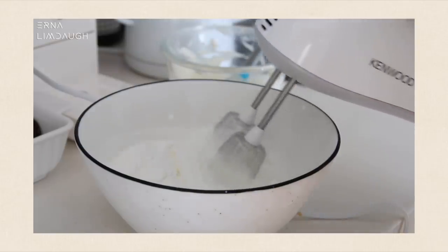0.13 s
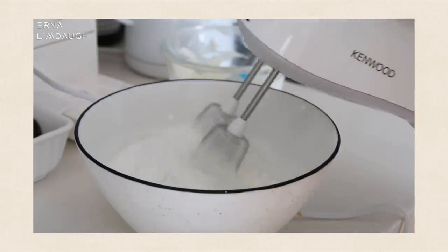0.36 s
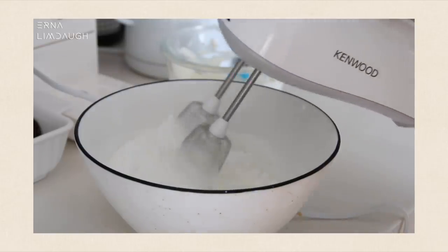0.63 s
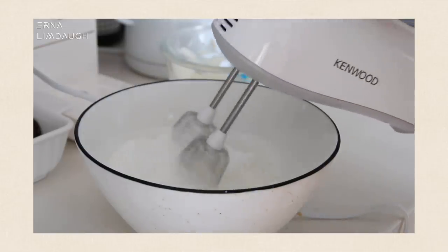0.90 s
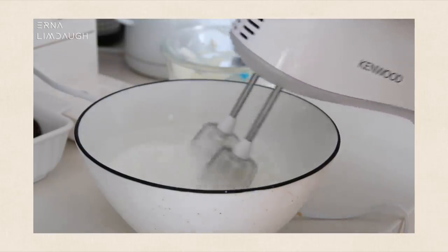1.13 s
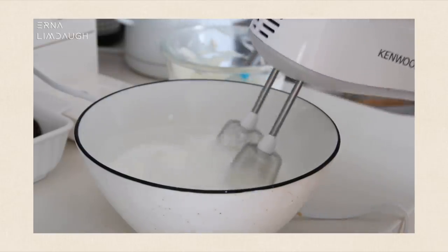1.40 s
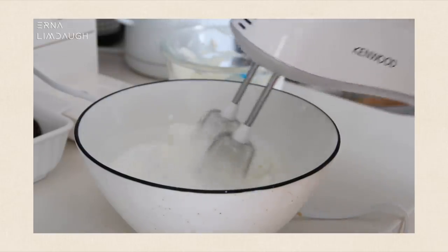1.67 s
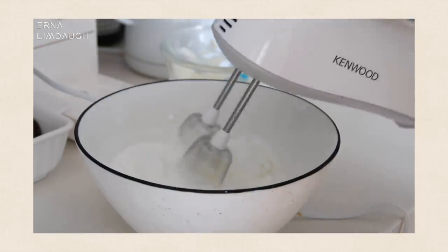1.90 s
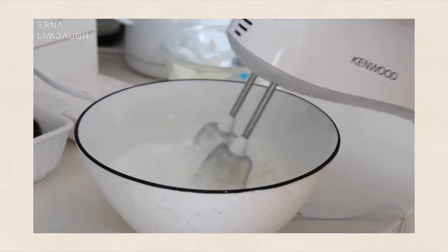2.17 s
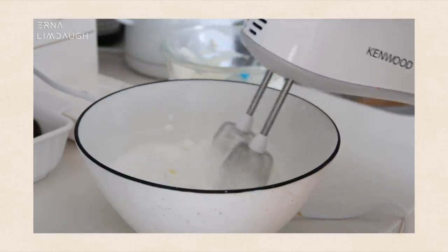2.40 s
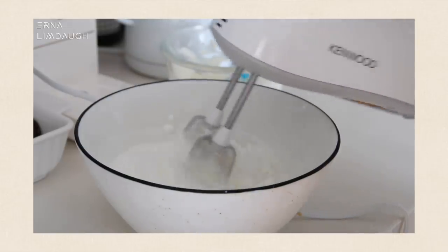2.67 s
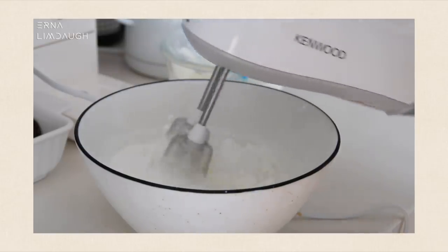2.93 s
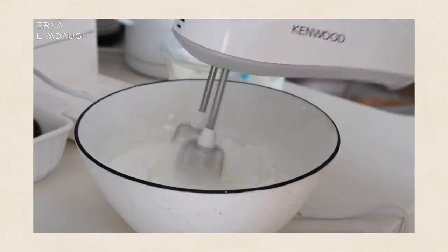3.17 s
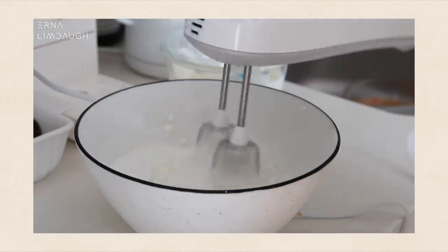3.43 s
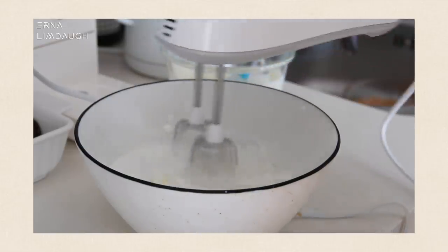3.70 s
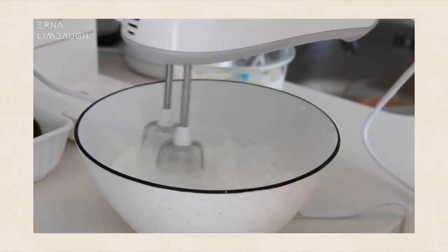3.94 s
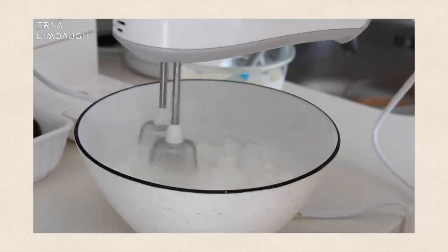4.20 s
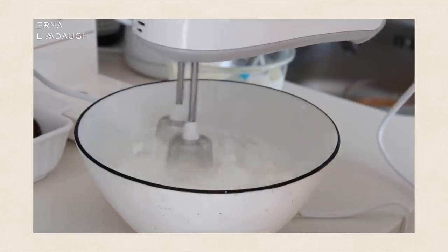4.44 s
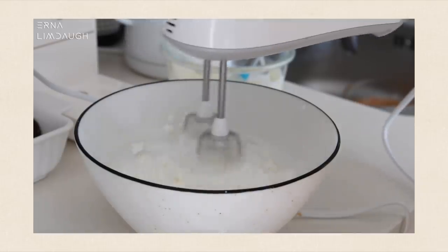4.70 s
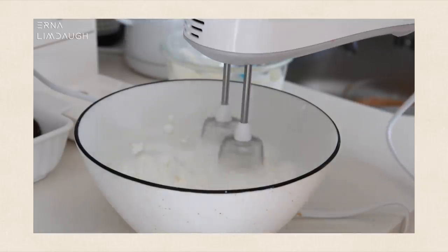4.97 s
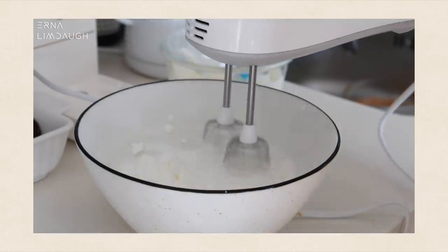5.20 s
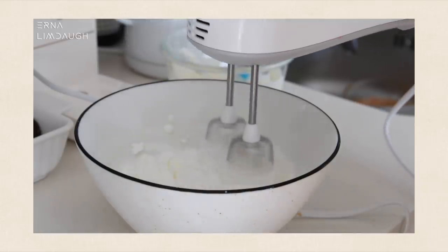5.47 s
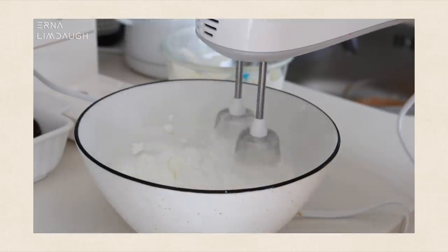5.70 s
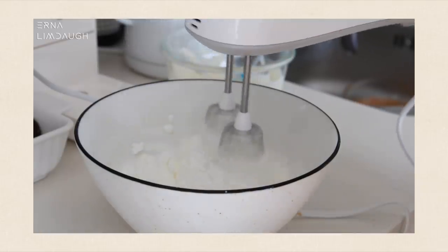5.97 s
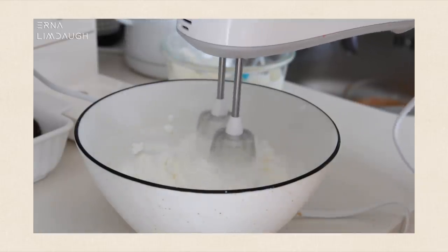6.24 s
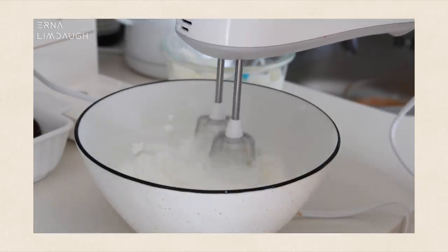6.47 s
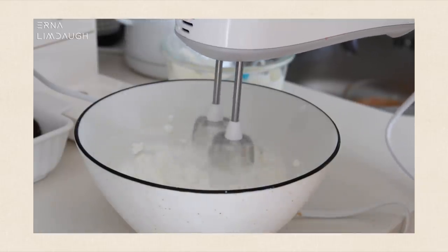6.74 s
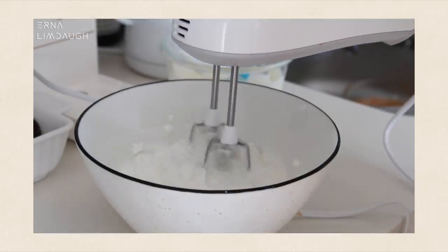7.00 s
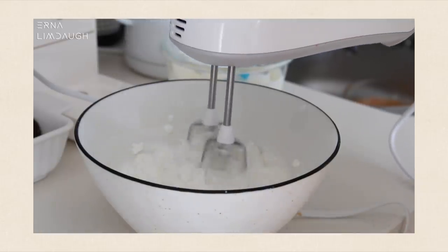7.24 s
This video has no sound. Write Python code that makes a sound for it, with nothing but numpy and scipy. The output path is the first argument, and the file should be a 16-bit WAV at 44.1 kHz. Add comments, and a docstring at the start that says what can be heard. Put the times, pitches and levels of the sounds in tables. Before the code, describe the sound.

An electric hand mixer is already running at full speed, close by and slightly left, in a small kitchen with a short dull echo. Its high, buzzing whine throbs rapidly, swelling and fading as the hand moves, over a low drone, fan air and gear rush. Soft, dull cream slaps flutter underneath. From 0 to 0.6 s the beaters strike the enamel bowl in bright, ticking clinks, the last ones weaker. Two duller, boomy knocks come around 2.9 s. From 4.1 to 4.9 s an irregular rattle of clacks and clinks breaks out. The pitch sags very slightly under load, lifting briefly near 5.8 s. Faint taps come at 6.2 and 6.4 s. At about 6.45 s power cuts: the whine vanishes and the motor coasts downward, quieter and rougher. At 7.06 s it kicks in again with a coarse, sparking growl, climbing in pitch until the end at about 7.4 s, still below full speed.

```python
"""In a kitchen, a hand mixer whips cream in an enamel bowl. The brushed motor whines at twelve slots a turn,
amplitude-modulated at twice the mains rate; filtered noise gives fan air and gear rush, and short dull
resonances give the slapping cream. The beaters now and then knock the bowl, whose modes ring and echo.
Near the end the power is cut, the motor coasts down, and it is switched on again and growls up to speed."""
import sys
import numpy as np
from scipy import signal
from scipy.fft import irfft
from scipy.io import wavfile

SR = 44100
rng = np.random.default_rng(int(sys.argv[2]) if len(sys.argv) > 2 else 0)


def dump_mix(stems):
    """Bounce the given channels to the path in sys.argv[1] as a 16-bit WAV at rate SR."""
    frames = np.atleast_2d(stems).T  # one column per channel
    limited = np.clip(frames, -1, 1)  # hard clip at full scale
    pcm = np.round(limited * 32767).astype(np.int16)
    wavfile.write(sys.argv[1], SR, pcm)


def convert_level_to_amplitude(level_db):
    """Map a level in decibels to its linear amplitude factor."""
    exponent = np.asarray(level_db, float) / 20
    return 10 ** exponent


N = 325017

# Stereo: left-right likeness against pitch (f/Hz, likeness); the lean of most sources to the left
LIKENESS = [(60, 0.97), (180, 1), (550, 0.96), (1650, 0.85), (4970, 0.053), (15000, 0.072)]
LEFT_DB, GROWL_LEFT_DB = 5.5, 4.5

# Noise spectra: mixer rush, relative (f/Hz, level/dB), and room floor, relative (f/Hz, level/dB)
RUSH_COLOUR = [(20, -58), (40, -15), (100, -37), (174, -15), (250, -29), (330, -6.5), (486, -8),
               (801, -8.5), (1040, -11), (1960, -16), (2540, -2.5), (2900, -15.5), (3400, -12),
               (6000, -24.5), (8740, -21), (12000, -33.5), (16000, -33)]
ROOM_COLOUR = [(24, -58), (40, -24), (101, 3.5), (130, -2.5), (1680, -5.5), (2050, -62), (3380, -27),
               (16000, -13)]
# Resonances of the plastic housing (f/Hz, width/Hz, gain/dB)
HOUSING = [(565, 22, 8.5), (1239, 59, 8.5), (1856, 234, 3.5), (2840, 120, 4.5)]
# Densities in dB per Hz, to which the colours are added; the laws are in dB per decade of speed
ROOM_DB, BODY_DB, HISS_DB = -94.5, -75.5, -74.5
BODY_LAW_DB, HISS_LAW_DB = 38.5, 19

KITCHEN_T60_S, WALL_CUT_HZ, ECHO_DB = 0.3, 7000, -11

# Dull notes of beaters and bowl wall under the cream (f/Hz, level/dB, t60/s)
BURBLE = [(425, -52.5, 0.044), (546.8, -54, 0.14), (597, -57.5, 0.067), (1236, -52.5, 0.039),
          (1952, -53.5, 0.046)]
SLAPS_PER_S, SLAP_SPREAD_DB = 30, 4   # for each note, at full speed

# Beater on bowl (t/s, clink level/dB, boom level/dB, thud level/dB, ring level/dB, tick over clack/dB)
KNOCKS = [(.0407, -35, -28, -37, -44.5, 6), (.0602, -34.5, -44, -38.5, -49, 4),
          (.1245, -31.5, -37, -37.5, -49, 10), (.2108, -31.5, -32, -39, -47.5, 8),
          (.2966, -29, -42, -37.5, -40, 1), (.3839, -32.5, -38, -40, -38, 2.5),
          (.4942, -42, -57, -64, -60, -6), (.5844, -42, -53, -51, -49, -14),
          (2.877, -45, -31, -39, -58.5, -28), (2.9606, -42, -31.5, -40.5, -53, -22),
          (4.0715, -35, -34, -50, -46, -12), (4.0925, -32, -44, -39, -38.5, 4),
          (4.1134, -30.5, -56, -39, -43, -4), (4.1863, -37, -44, -42, -59, -5),
          (4.2047, -30.5, -36, -36.5, -49.5, 2), (4.3, -36, -37, -44, -58, -17),
          (4.3898, -32.5, -36.5, -37.5, -54, -4), (4.4871, -40, -40, -49, -55, -15),
          (4.6517, -34.5, -47, -45, -46, -14), (4.6712, -31.5, -34, -38, -53, -19),
          (4.7211, -31.5, -58, -42, -69, -15), (4.7425, -32.5, -39, -47, -44.5, -14),
          (4.7665, -38, -44, -44, -59, -18), (4.8398, -43, -51, -59, -66, -12),
          (4.8603, -35, -43, -49, -62, -15), (6.1994, -42.5, -55, -48, -62, 0),
          (6.4062, -42, -52, -42, -62, 1), (7.08, -48.5, -60, -48.5, -51.5, -1)]
# Bands of contact noise (low f/Hz, high f/Hz, level/dB)
CRACK = [(90, 580, 8.5), (315, 1400, 11), (1780, 2670, 8), (3800, 6330, -2.5), (6600, 9000, -1),
         (10000, 21000, -4)]
# Modes of the bowl (f/Hz, level/dB, t60/s); each takes the strength of its band
BOWL = [(139, -24.5, 0.37), (283, -12.5, 0.089), (580.3, -5.5, 0.14), (777, -0.5, 0.32),
        (1115, -4.5, 0.033), (1483, -29, 0.18), (1845, -8.5, 0.047), (1960, -15, 0.25), (2450, -11, 0.015),
        (2660, -20, 0.05), (3590, -20, 0.124), (4635, -17.5, 0.039), (4750, -14, 0.0089), (5510, -25, 0.17),
        (5600, -37, 0.018), (6870, -12, 0.038), (7820, -13, 0.097), (9320, -10.5, 0.095), (9810, -4, 0.024),
        (10520, -25, 0.15)]
# Limits between boom, thud, ring, clack, clink and tick (f/Hz)
BAND_EDGES_HZ = [220, 680, 1300, 3000, 6500]
CRACK_T60_S = 0.02
EDGE_DB = -7.5          # clack and tick lie around this, relative to the clink
SWELL_CYCLES = 2        # time constant with which the bowl wall takes up a blow
SINGS_S, SING_DB = 0.13, 3   # treble modes lasting longer also follow the ring level, with this gain

# Motor speed: sags under the cream, coasts and picks up again (t/s, turns per s)
SPEED = [(0, 246), (.36, 245), (.68, 245.2), (1.3, 242), (1.65, 242.5), (2.05, 243.6), (2.44, 242.8),
         (2.76, 241), (3.3, 240.6), (3.65, 241.2), (4.04, 239.4), (4.45, 238.7), (4.84, 237.1),
         (5.4, 236.7), (5.55, 238), (5.8, 243.4), (5.98, 243.6), (6.12, 241.6), (6.2, 239.5), (6.44, 229.2),
         (6.53, 204), (6.6, 187), (6.7, 155), (6.9, 103), (7.0, 81.5), (7.05, 74), (7.065, 74.5),
         (7.09, 78), (7.13, 84.5), (7.18, 96.5), (7.22, 105), (7.26, 111.5), (7.31, 117.5), (7.37, 122.5)]
# Whine lines, swelling and fading as the hand turns the vents (t/s, slot level/dB, mains line below level/dB,
# mains line above level/dB, commutator level/dB, second mains line below level/dB, left-right/dB)
WHINE = [(0.0, -53, -59, -52, -74, -62, 21), (0.14, -57.5, -63, -63, -62, -68, 5),
         (0.28, -58, -59, -65, -62, -63, 6), (0.42, -57, -66, -65, -83, -61, 1),
         (0.56, -64, -57.5, -58.5, -65, -60, 11), (0.7, -69, -52, -52.5, -71, -59, 12),
         (0.84, -54, -57, -57, -68, -55, 2.0), (0.98, -61, -56, -56, -66.5, -64.0, 6),
         (1.12, -57, -51.5, -58, -66, -63, 2), (1.26, -56, -51, -72, -67, -59, 1.0),
         (1.4, -52.5, -50, -71.0, -80, -68, 2), (1.54, -48.5, -51, -73, -81, -73, 0),
         (1.68, -52.5, -50, -68, -70, -62, 0), (1.82, -59, -52, -60, -69, -62, 11),
         (1.96, -67, -51.5, -55, -67, -57.5, 12), (2.1, -62, -52, -56, -69, -67, 8),
         (2.24, -57, -55, -56, -73, -59, 10), (2.38, -53, -59, -62, -70, -70, 14),
         (2.52, -53, -53, -78, -77, -62, -4), (2.66, -56, -51, -57, -68, -58, 7),
         (2.8, -63, -47.5, -62, -67, -66, 7), (2.94, -58, -47.5, -59, -73, -68, 7),
         (3.08, -54, -49.5, -58, -69, -65, 4), (3.22, -52, -47.5, -56, -66.5, -68, 1),
         (3.36, -49.5, -59, -56, -69, -60, 7), (3.5, -46, -55, -56, -65, -56, 9),
         (3.64, -46.5, -66, -61, -76.0, -57, 5), (3.78, -44, -56.5, -58, -70, -58, 3),
         (3.92, -50, -57, -62, -69, -65, 0.0), (4.06, -49.0, -58.5, -58, -62, -59, 6),
         (4.2, -60, -65, -60, -81, -56.0, -5), (4.34, -51.5, -74, -60, -69.0, -52, 3),
         (4.48, -56, -55, -61.0, -80, -53.5, 7), (4.62, -55, -56, -62, -71, -60.5, 4.0),
         (4.76, -59, -79, -61, -64, -64, 5.0), (4.9, -47.5, -71, -56, -68, -67.5, 10),
         (5.04, -44.5, -54, -62, -66, -64, 8.0), (5.18, -44, -58, -58, -67, -60, 9),
         (5.32, -43, -55, -63, -63, -67, 9.0), (5.46, -47, -55, -54, -65, -66, 8),
         (5.6, -49, -57, -61, -72, -69, 11), (5.74, -52.5, -58.5, -58, -66, -67, 13),
         (5.88, -50.0, -55, -54, -78, -65.5, 15), (6.02, -51, -62, -56.0, -69.0, -73, 23),
         (6.16, -52.5, -70, -57, -64, -55, 12), (6.26, -48.5, -53, -62, -74, -66, 6.0),
         (6.34, -55.5, -59, -60, -65, -65, 6.0), (6.4, -51, -53, -59, -72, -63, 9),
         (6.45, -54, -71.5, -52, -68, -65, 4.0)]
# Part reaching the two sides out of step, by paths round the housing
# (t/s, slot level/dB, mains line below level/dB, mains line above level/dB)
OUT_OF_STEP = [(0.0, -60.0, -62.0, -65.0), (0.28, -67.0, -54, -64), (0.56, -60.0, -54, -63.0),
               (0.84, -58.0, -51, -66.0), (1.12, -58, -55, -67.0), (1.4, -62, -61, -76.0),
               (1.68, -57, -56, -71.0), (1.96, -52, -53, -64.0), (2.24, -62.0, -55, -62.0),
               (2.52, -51, -59.0, -66.0), (2.8, -55, -61.0, -65.0), (3.08, -63, -64.0, -68.0),
               (3.36, -60.0, -64.0, -67.0), (3.64, -52, -57, -71.0), (3.92, -58, -52, -70.0),
               (4.2, -62, -61, -65.0), (4.48, -62.0, -58, -65.0), (4.76, -61.0, -61, -64.0),
               (5.04, -56, -63.0, -64.0), (5.32, -56, -67.0, -67.0), (5.6, -55.0, -66.0, -67.0),
               (5.88, -53, -63.0, -63.0), (6.16, -54.0, -65.0, -64.0), (6.44, -58, -73, -67)]
# Strongest low tones (t/s, second order level/dB, third order level/dB, fourth order level/dB)
DRONE = [(0, -59.5, -65, -61.5), (.9, -62, -60.5, -57.5), (2, -59.5, -61.5, -56), (3.2, -62, -61, -58.5),
         (3.6, -58.5, -63.5, -54.5), (4.2, -57, -64, -58.5), (4.85, -56.5, -59, -62),
         (5.5, -56, -62.5, -55), (6.1, -60.5, -63.5, -62.5), (6.4, -58.5, -51.5, -57),
         (6.55, -65, -59.5, -69), (6.8, -62, -61, -62), (7.37, -71, -63, -68)]
# Unbalance and pole tones (multiple of the turn rate, level/dB)
LOW_ORDERS = [(1, -66), (5, -65.5), (6, -67), (7, -69.5), (8, -62), (9, -67.5), (10, -66.5), (13, -67),
              (36, -74)]
# Brush contacts (multiple of the turn rate, level/dB)
BRUSH = [(14, -81), (20, -77), (32, -75), (42, -75.5), (52, -75), (64, -75.5)]
# Growl lines split off by an off-centre rotor (shift in turn rates, level/dB below the growl)
GROWL_SIDES = [(-2, -15), (-1, -15), (1, -15)]
# Swells of the growl where it crosses the housing's pitches (f/Hz, width/Hz, gain/dB)
GROWL_PEAKS = [(920, 59, 9.5), (1260, 50, 3.5)]
# Passband of the brush sparks (low f/Hz, high f/Hz)
SPARKS_HZ = [1270, 5450]
FULL_TURNS_PER_S, SLOTS, MAINS_THROB_HZ = 242, 12, 120
THROB_WANDER = 0.8      # rms phase wander of each whine line, radians
SWITCH_OFF_S, SWITCH_ON_S, CURRENT_DIES_S = 6.45, 7.062, 0.012
# Inrush of current: the growl rises, holds, then eases
INRUSH_DB, INRUSH_RISE_S, INRUSH_HOLD_S, INRUSH_EASE_DB_PER_S = -46.5, 0.004, 0.067, 48
# Relative to the growl: mains lines, second and third slot harmonics, sparks
GROWL_THROB_DB, GROWL_SECOND_DB, GROWL_THIRD_DB, SPARKS_DB = -6, -13.5, -20, -12
COASTING_DB, RESTART_COMMUTATOR_DB = -67.5, -69
VENT_HZ, VENT_WIDTH_HZ, VENT_DB = 2820, 260, 13.5   # commutator tone swells at the vent's pitch
HUM_DB, RESTART_HUM_DB = -77.5, -67

CUTOFF_HZ = 15900


def rms_one(x):
    """Normalisation to unit mean power."""
    return x / np.sqrt(np.mean(x ** 2) + 1e-20)


def in_time(rows):
    """Linear interpolation of a table's columns, one value a sample."""
    s, *columns = np.transpose(rows)
    return [np.interp(np.arange(N) / SR, s, column) for column in columns]


def at_hz(points, hz):
    """Interpolation of a spectrum on a logarithmic frequency axis."""
    point_hz, value = np.transpose(points)
    return np.interp(np.log(hz), np.log(point_hz), value)


def drift(rate):
    """Random modulation: unit-rms noise through two equal low-pass poles at rate (Hz)."""
    hop = 100
    r = np.exp(-2 * np.pi * rate * hop / SR)
    noise = rng.standard_normal(N // hop + 2002)
    slow = signal.lfilter([1], [1, -2 * r, r * r], noise)[2000:]   # after the filter has settled
    return np.interp(np.arange(N) / hop, np.arange(len(slow)), rms_one(slow))


def band(x, low_hz, high_hz):
    """Band-pass filtering."""
    return signal.sosfilt(signal.butter(2, [low_hz, high_hz], "band", fs=SR, output="sos"), x)


def pan(db):
    """Interaural level difference: left and right gains whose mean is 1."""
    left = np.atleast_1d(convert_level_to_amplitude(db))
    return 2 * np.array([left, np.ones_like(left)]) / (1 + left)


def tone(phase, hz, db):
    """Interaural phase difference: a sine of given rms, the sides further apart where likeness is low."""
    apart = np.arccos(np.clip(at_hz(LIKENESS, hz), 0, 1)) * rng.standard_normal()
    start = rng.uniform(0, 2 * np.pi)
    return np.sqrt(2) * convert_level_to_amplitude(db) * np.sin(phase + start + np.array([[apart / 2], [-apart / 2]]))


def ring(clicks, hz, t60, swell_cycles):
    """Modal resonance: a click sets off a decaying sine after a short swell."""
    r, w = convert_level_to_amplitude(-60 / (t60 * SR)), 2 * np.pi * hz / SR
    soft = np.exp(-hz / (swell_cycles * SR))
    turning = np.exp(1j * w * np.arange(N))
    held = signal.lfilter([1], [1, -soft], clicks / turning)
    return (signal.lfilter([1 - soft], [1, -r], held) * turning).imag


def rush():
    """Broadband noise in half-octave bands: air and gears rise with speed over the room's floor."""
    decades = np.log10(in_time(SPEED)[0] / FULL_TURNS_PER_S)
    body_db = BODY_DB + BODY_LAW_DB * decades + 0.8 * drift(1.2)
    hiss_db = HISS_DB + HISS_LAW_DB * decades + 0.7 * drift(1.5)
    out, together = 0, drift(8)
    edges = 28 * 2 ** np.arange(0, 9.6, 0.5)
    white = rng.standard_normal((2, 2, N))
    for k, (low, high) in enumerate(zip(edges, edges[1:])):
        mid, side = band(white[k % 2], low, high)   # neighbouring bands stay independent
        hz = np.sqrt(low * high)
        alike = np.clip(at_hz(LIKENESS, hz), 0, 1)
        bright = np.clip(np.log2(hz / 1200) / 3, 0, 1)
        level_db = (1 - bright) * body_db + bright * hiss_db
        mixer = convert_level_to_amplitude(at_hz(RUSH_COLOUR, hz) + level_db + together + 0.96 * drift(9.5))
        gain = np.hypot(mixer, convert_level_to_amplitude(at_hz(ROOM_COLOUR, hz) + ROOM_DB))
        out = out + gain * (np.sqrt(1 + alike) * mid + np.sqrt(1 - alike) * side * [[1], [-1]])
    for hz, width_hz, db in HOUSING:
        r = np.exp(-np.pi * width_hz / SR)
        poles = [1, -2 * r * np.cos(2 * np.pi * hz / SR), r * r]
        peak = signal.lfilter(np.array([1, 0, -1]) * (1 - r * r) / 2, poles, out)
        out = out + (convert_level_to_amplitude(db) - 1) * peak
    return np.sqrt(SR / 4) * out * pan(LEFT_DB)   # the root makes 0 dB unit power per Hz


def kitchen(x):
    """Reverberation: a dense, dull, exponentially decaying tail, different on each side."""
    s = np.arange(SR // 2) / SR
    tail = rng.standard_normal((2, len(s))) * convert_level_to_amplitude(-60 * s / KITCHEN_T60_S) * (s > 0.004)
    tail = band(tail, 900, WALL_CUT_HZ)
    tail = tail / np.sqrt(np.sum(tail ** 2) / 2)
    return signal.fftconvolve(x[None], tail, axes=1)[:, :N]


def cream():
    """Random excitation of damped notes: soft slaps, fewer and weaker as the beaters slow."""
    speed = in_time(SPEED)[0] / FULL_TURNS_PER_S
    out = 0
    for hz, db, t60 in BURBLE:
        struck = rng.random(N) < SLAPS_PER_S * speed / SR
        slaps = struck * convert_level_to_amplitude(db + SLAP_SPREAD_DB * rng.standard_normal(N)) * speed ** 2
        out = out + ring(slaps + 1e-18, hz, t60, swell_cycles=7.8)
    return out * pan(LEFT_DB)


def knocks():
    """Impact excitation: a hit and a bounce strike every bowl mode afresh, with a short grainy crack."""
    s, clink_db, boom_db, thud_db, ring_db, sharp_db = np.transpose(KNOCKS)
    clack_db = clink_db + EDGE_DB - sharp_db / 2
    tick_db = clink_db + EDGE_DB + sharp_db / 2
    strength_db = [boom_db, thud_db, ring_db, clack_db, clink_db, tick_db]
    bounce_s = s + 0.007 + 0.001 * rng.standard_normal(len(s))
    hits = (np.array([s + 0.001, bounce_s]) * SR).astype(int)
    ringing = np.zeros(N)
    for hz, db, t60 in BOWL:
        struck_db = strength_db[np.digitize(hz, BAND_EDGES_HZ)]
        if t60 > SINGS_S and hz > BAND_EDGES_HZ[2]:
            struck_db = (struck_db + ring_db) / 2 + SING_DB
        clicks = np.full(N, 1e-18)
        # rows: hit, bounce
        clicks[hits] = convert_level_to_amplitude(struck_db + db + [[3], [-6]] + 2.1 * rng.standard_normal(hits.shape))
        ringing += ring(clicks, hz, t60, SWELL_CYCLES)
    high_pass = signal.butter(2, 110, "high", fs=SR, output="sos")
    out = signal.sosfilt(high_pass, ringing) * np.ones((2, 1))
    for low_hz, high_hz, db in CRACK:
        struck_db = strength_db[np.digitize(np.sqrt(low_hz * high_hz), BAND_EDGES_HZ)]
        blow = np.full(N, 1e-18)
        blow[hits] = convert_level_to_amplitude(struck_db + db + [[2], [-1.5]])
        # noise common to both sides, plus a part of each side's own
        grain = rng.standard_normal(N) + min(0.74, low_hz / 1500) * rng.standard_normal((2, N))
        crack = signal.lfilter([1], [1, -convert_level_to_amplitude(-60 / (CRACK_T60_S * SR))], blow) * grain
        out += band(crack, low_hz, high_hz)
    return out * pan(LEFT_DB)


def brushes(shaft):
    """Periodicity: patterns of one turn each repeat with the shaft and fade slowly into one another."""
    multiples, out = np.arange(14, 65), 0
    place = (shaft / (2 * np.pi) % 1 * 8192).astype(int)
    for _ in range(7):
        spectrum = np.zeros((2, 4097), complex)
        levels = convert_level_to_amplitude(at_hz(BRUSH, multiples) + 2.3 * rng.standard_normal(len(multiples)))
        phases = 2 * np.pi * rng.random((2, len(multiples)))
        spectrum[:, multiples] = 4096 * levels * np.exp(1j * phases)
        out = out + irfft(spectrum)[:, place] * drift(2)
    return out / 2


def low_tones(shaft, mains, turns, again, drive_db):
    """Harmonics of rotation: unbalance, pole and brush tones fall with speed; hum follows the mains."""
    speed_db = 30 * np.log10(turns / FULL_TURNS_PER_S)
    out = tone(2 * mains, 240, np.where(again, RESTART_HUM_DB, HUM_DB + drive_db))
    wavers_db = [3.2 * drift(7), 2.8 * drift(8.3), 1.9 * drift(17)]
    for order, db, waver_db in zip((2, 3, 4), in_time(DRONE), wavers_db):
        out += tone(order * shaft, order * 240, db + speed_db + 0.15 * drive_db + waver_db)
    for multiple, db in LOW_ORDERS:
        waver_db = 3 * drift(2.8) + 1.45 * drift(28)
        level_db = db + speed_db + 0.67 * drive_db + waver_db
        out += tone(multiple * shaft, multiple * FULL_TURNS_PER_S, level_db)
    return out + convert_level_to_amplitude(speed_db + 0.85 * drive_db) * brushes(shaft)


def commutator(slots, mains, turns, again, current, growl_db, slow, ragged):
    """Higher slot harmonics with mains sidebands; the restart sweeps through the vent's resonance."""
    bars_db = in_time(WHINE)[3]
    drive_db = 12 * (current - 1)
    vent_db = VENT_DB * np.exp(-((2 * SLOTS * turns - VENT_HZ) / VENT_WIDTH_HZ) ** 2)
    restart_db = np.maximum(growl_db + GROWL_SECOND_DB, RESTART_COMMUTATOR_DB) + vent_db
    before_db = current * bars_db + (1 - current) * COASTING_DB
    db = np.where(again, restart_db, before_db)
    out = tone(2 * slots + 1.3 * slow * drift(60), 1200, db + ragged * drift(40))
    third_db = np.minimum(db, -64) + drive_db - 11 - 4 * again
    for side in (-1, 1):
        out += tone(2 * slots + side * mains, 5800, db + drive_db - 6 + ragged * drift(30))
        out += tone(3 * slots + side * mains, 2500, third_db + ragged * drift(30))
    # the fourth harmonic comes forward while coasting
    fourth_db = COASTING_DB - 4 - 9 * current + 30 * np.log10(turns / FULL_TURNS_PER_S)
    return out + ~again * tone(4 * slots, 8000, fourth_db + ragged / 2 * drift(20))


def growl_swell(hz):
    """Resonance: gain in dB of the housing for a line at a moving pitch."""
    return sum(db * np.exp(-((hz - peak_hz) / width_hz) ** 2) for peak_hz, width_hz, db in GROWL_PEAKS)


def growl(shaft, mains, turns, growl_db, ragged):
    """Modulation under inrush current: slot lines split by mains and rotor offset, with sparking noise."""
    slots, slots_hz = SLOTS * shaft, SLOTS * turns
    out = 0
    for side in (0, -1, 1):
        swell_db = growl_swell(slots_hz + side * MAINS_THROB_HZ)
        level_db = growl_db + abs(side) * GROWL_THROB_DB + swell_db
        out += tone(slots + side * mains, 1000, level_db + ragged * drift(30))
    for shift, db in GROWL_SIDES:
        level_db = growl_db + db + growl_swell(slots_hz + shift * turns)
        out += tone(slots + shift * shaft, 1000, level_db + ragged * drift(36))
    third_db = np.maximum(growl_db + GROWL_THIRD_DB, -76)
    out += tone(3 * slots, 2500, third_db + 1.5 * ragged * drift(40))
    sparks = rms_one(band(rng.standard_normal((2, N)), *SPARKS_HZ))
    return out + convert_level_to_amplitude(growl_db + SPARKS_DB + 1.9 * drift(59)) * sparks


def slot_line(phase, db, left_db, out_of_step_db):
    """Superposition: a panned part common to both sides, and an opposed part that changes sign."""
    common = convert_level_to_amplitude(db) * np.sin(phase) * pan(left_db)
    lead = np.tanh(3 * drift(0.74))   # now one side ahead, now the other
    opposed = convert_level_to_amplitude(out_of_step_db) * lead * np.cos(phase) * [[1], [-1]]
    return np.sqrt(2) * (common + opposed)


def slot_whine(slots, mains, current):
    """Amplitude modulation: magnetic pull at twice the mains rate gives the slot tone sidebands."""
    slot_db, below_db, above_db, _, second_below_db, left_db = in_time(WHINE)
    pull_db = 20 * np.log10(current + 0.012)
    out = 0
    for side, db, out_of_step_db in zip((0, -1, 1), (slot_db, below_db, above_db), in_time(OUT_OF_STEP)):
        waver_db = pull_db + 1.27 * drift(29)
        phase = slots + side * mains + THROB_WANDER * drift(0.6)
        out += slot_line(phase, db + waver_db, left_db, out_of_step_db + waver_db)
    phase = slots - 2 * mains - 1.3 + THROB_WANDER * drift(2)
    second = np.sqrt(2) * convert_level_to_amplitude(second_below_db + pull_db + drift(8)) * np.sin(phase)
    return out + second * pan(LEFT_DB)


def motor():
    """Phase locking: every rotational tone follows one shaft angle, through power cut and restart."""
    turns, = in_time(SPEED)
    s = np.arange(N) / SR
    again, since = s >= SWITCH_ON_S, np.maximum(s - SWITCH_ON_S, 0)
    dying = np.exp(-np.maximum(s - SWITCH_OFF_S, 0) / CURRENT_DIES_S)
    current = np.where(again, 1, dying)
    slow = np.clip(1 - turns / 235, 0, 1)
    ragged = 1.3 + 3.5 * slow   # the pull is uneven at low speed
    jitter = 0.0005 * drift(12) + slow * (0.035 * drift(200) + 0.011 * drift(18))
    shaft = 2 * np.pi * np.cumsum(turns * (1 + jitter)) / SR
    mains = 2 * np.pi * MAINS_THROB_HZ * s
    slots = SLOTS * shaft
    rise_db = 20 * np.log10(np.clip(since / INRUSH_RISE_S, 1e-3, 1))
    ease_db = INRUSH_EASE_DB_PER_S * np.maximum(since - INRUSH_HOLD_S, 0)
    growl_db = INRUSH_DB + rise_db - ease_db
    rest = low_tones(shaft, mains, turns, again, 12 * (current - 1))
    rest += commutator(slots, mains, turns, again, current, growl_db, slow, ragged)
    growling = again * growl(shaft, mains, turns, growl_db, ragged)
    whine = ~again * slot_whine(slots, mains, current)
    return rest * pan(LEFT_DB) + growling * pan(GROWL_LEFT_DB) + whine


def scene():
    """Superposition of rush, cream, bowl and motor; the knocks also reverberate in the kitchen."""
    bowl = knocks()
    echoes = convert_level_to_amplitude(ECHO_DB) * kitchen(bowl.mean(axis=0)) * pan(LEFT_DB)
    return rush() + echoes + cream() + bowl + motor()


def roll_off(x):
    """The treble ends steeply here."""
    return signal.sosfilt(signal.butter(12, 16650, fs=SR, output="sos"), x)


def record(dry):
    """Low-pass filtering: a steep filter cuts the top."""
    low_pass = signal.cheby2(16, 30, CUTOFF_HZ, fs=SR, output="sos")
    mix = signal.sosfilt(low_pass, dry)
    return roll_off(mix)


dry = scene()
out = record(dry)
dump_mix(out)
```